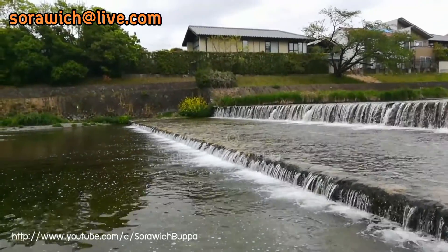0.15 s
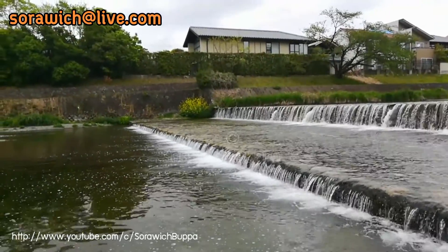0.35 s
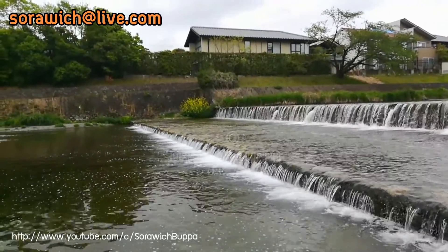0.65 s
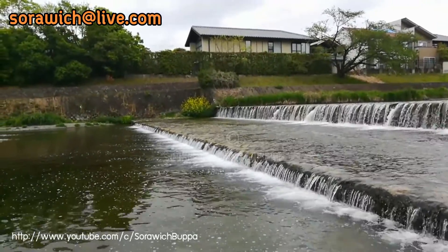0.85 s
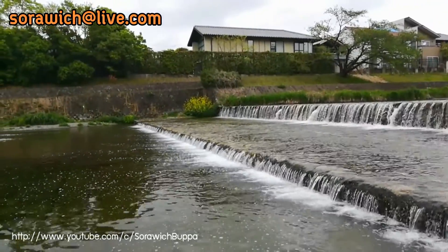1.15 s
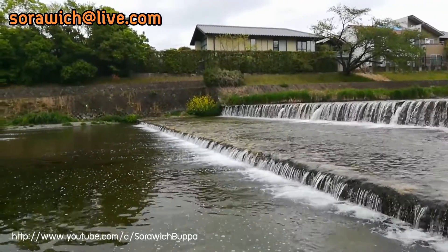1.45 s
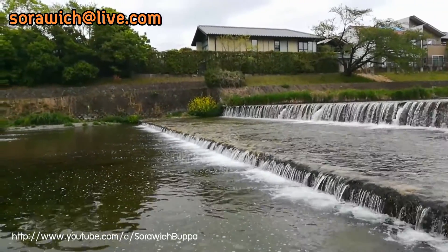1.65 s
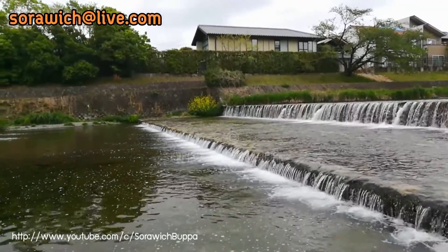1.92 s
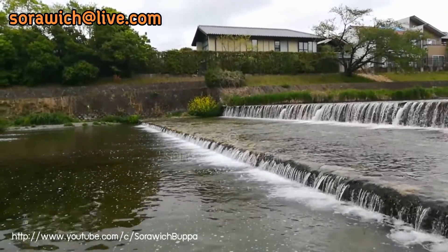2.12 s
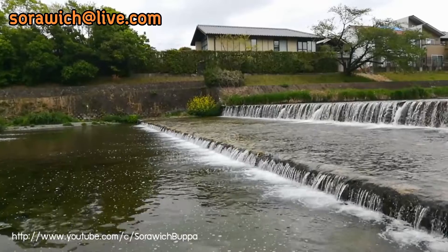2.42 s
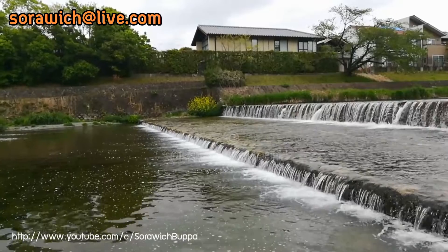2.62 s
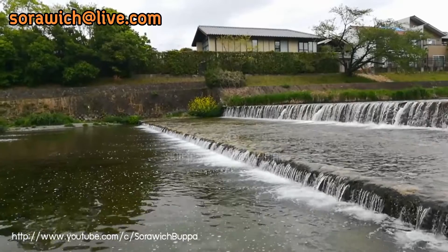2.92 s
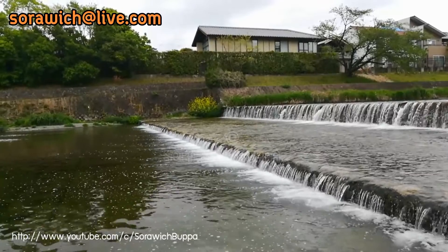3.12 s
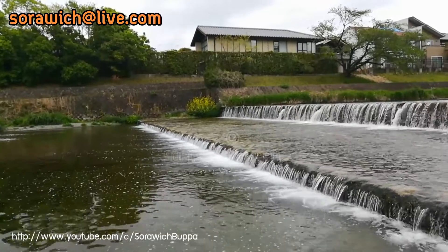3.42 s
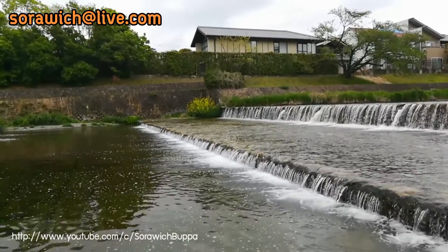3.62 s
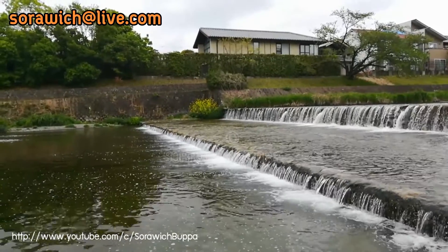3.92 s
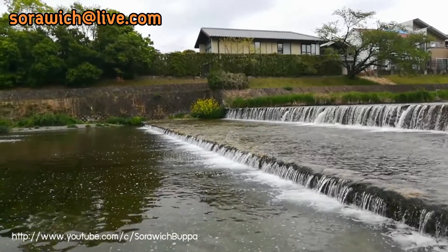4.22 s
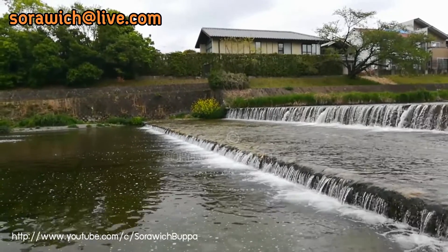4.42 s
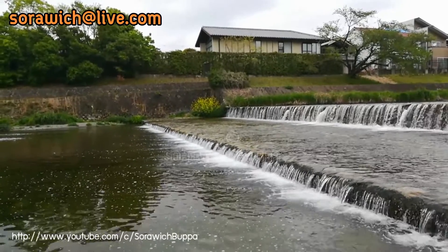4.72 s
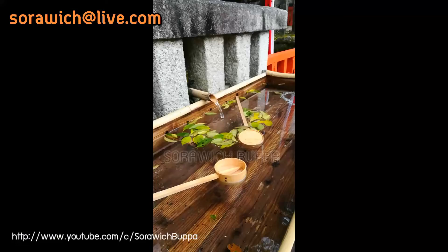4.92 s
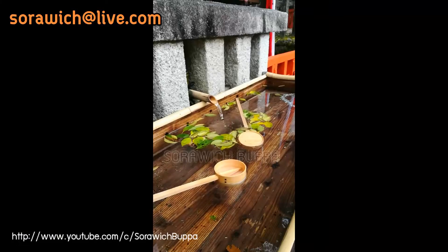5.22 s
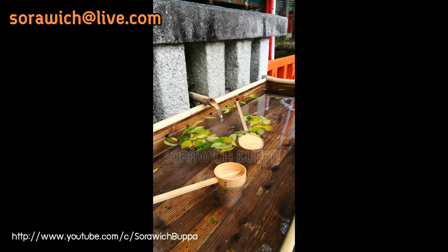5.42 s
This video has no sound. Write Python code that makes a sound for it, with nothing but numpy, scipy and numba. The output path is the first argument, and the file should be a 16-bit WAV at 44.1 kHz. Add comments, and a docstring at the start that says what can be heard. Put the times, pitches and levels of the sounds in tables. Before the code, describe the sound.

River water rushes loudly over low weirs with gusts rumbling on the microphone, stops dead, then a thin trickle fades in, gurgling into a basin.

```python
"""River weir, then bamboo spout

A river pours over low stepped weirs to the right: noise and swarms of ringing bubbles make the rush and spray.
A breeze rumbles on the microphone in gusts; late on, a surface close to the right port combs the hiss.
The rush stops dead; after a moment of silence a thin stream from a bamboo spout fades in, pattering
and gurgling into a basin: high bubble swarms, a few fine rings, low damped bubbles and a spatter of drops."""
import sys
import numpy as np
from scipy import signal
from scipy.fft import rfft, irfft
from scipy.io import wavfile
from numba import njit

SR = 44100
rng = np.random.default_rng(int(sys.argv[2]) if len(sys.argv) > 2 else 0)


def unload_wav(signal):
    """Save mono or channel-first audio to the path in sys.argv[1] as 16-bit WAV at rate SR, clipped to [-1, 1]."""
    wavfile.write(
        sys.argv[1],
        SR,
        np.round(np.clip(np.atleast_2d(signal).T, -1, 1) * 32767).astype(np.int16),
    )


N = 244735
T = np.arange(N) / SR
HZ = np.maximum(np.arange(N // 2 + 1) * SR / N, 1)


def undb(db):
    """Decibels to gain."""
    return 10 ** (np.asarray(db) / 20)


def unit(x):
    """Centre and scale to rms 1."""
    return (x - np.mean(x)) / np.std(x)


def curve(rows):
    """Join (t/s, value) rows by straight lines."""
    return np.interp(T, *np.transpose(rows))


def over_hz(rows):
    """Each column of an (f/Hz, ..) table on a log-frequency axis."""
    hz, *columns = np.transpose(rows)
    return np.array([np.interp(np.log(HZ), np.log(hz), column) for column in columns])


def colour(x, rows):
    """Filter by an (f/Hz, level/dB) or (f/Hz, left level/dB, right level/dB) table."""
    return irfft(rfft(x) * undb(over_hz(rows)), N)


def walk(rate_hz):
    """Smooth chance of spread 1 that changes about rate_hz times a second."""
    lowpass = np.exp(-(HZ / rate_hz) ** 2)
    return unit(irfft(rfft(rng.standard_normal(N)) * lowpass, N))


@njit
def ring(start_s, hz, t60_s, size, rise):
    """Damped sines whose pitch climbs by the share rise while they die: bubbles nearing the surface."""
    out = np.zeros(N)
    for k in range(len(start_s)):
        first, length = int(start_s[k] * SR), t60_s[k] * SR
        step = 2 * np.pi * hz[k] / SR
        z = size[k] + 0j
        turn = np.exp(1j * step - np.log(1000) / length)  # one sample of rotation and decay
        glide = np.exp(1j * step * rise / length)
        for i in range(max(first, 0), min(first + int(length), N)):
            out[i] += z.imag
            z *= turn
            turn *= glide
    return out


def swarm(low_hz, high_hz, cycles, spread_db, rise, count):
    """Bubbles of random moment, pitch and size, together as dense as a unit white noise in their band."""
    when, pitch, life, chance = rng.random((count, 4)).T
    hz = low_hz + (high_hz - low_hz) * pitch
    t60_s = cycles * (.5 + life) / hz
    # with a positive spread most are small and a few stand out
    size = undb(-spread_db * np.log(chance + 0.003)) / np.sqrt(t60_s)
    bubbles = unit(ring(when * N / SR, hz, t60_s, size, rise))
    return bubbles * np.sqrt((high_hz - low_hz) / (SR / 2))


def froth(grains, share):
    """Single grains, by their share of the power, over the smooth wash of countless distant ones."""
    share = np.clip(share, 0, 1)
    return np.sqrt(share) * grains + np.sqrt(1 - share) * rng.standard_normal(N)


def ports(pair):
    """Make two unrelated sounds alike at the two microphone ports by a share that varies with pitch."""
    # how alike the ports hear the water: (f/Hz, likeness 0-1, phase lead of the right port/rad)
    port_likeness = [(160, 0.98, -0.2), (290, 0.9, 0.84), (453, 0.9, 1.49), (610, 0.84, 2), (795, 0.7, 1.5),
                     (970, 0.5, 1.25), (1230, 0.5, 0.37), (1470, .15, 1.65), (1570, 0.5, 0.24),
                     (1710, 0.63, 2.5), (2200, 0.07, -0.5), (2370, 0.5, -1.5), (3120, 0.6, -5.5),
                     (4020, 0.8, -7.5)]
    likeness, lead = over_hz(port_likeness)
    likeness = np.clip(likeness, 0, 1)
    left, other = rfft(np.array(pair))
    right = likeness * left + np.sqrt(1 - likeness ** 2) * other
    return irfft(np.array([left, right * np.exp(1j * lead)]), N)


def plunge():
    """The falling sheet drives air under: bubbles over the roar of bubble clouds, singly on the near right side."""
    # the rush, as the level of a white noise of the same density: (f/Hz, left level/dB, right level/dB)
    rush_levels = [(20, -35.5, -33), (84, -18.5, -19.5), (162, -13, -13), (279, -19.5, -21),
                   (440, -19, -17), (643, -24, -19.5), (830, -18.5, -13.5), (1030, -20.5, -18.5),
                   (1262, -14.5, -16.5), (1374, -21.5, -21), (1510, -18, -19), (2070, -23, -27.5),
                   (3180, -25, -28), (12000, -44.5, -43.5)]
    far = swarm(62, 5987, cycles=20, spread_db=2.0, rise=0.079, count=24000)
    far = froth(far, share=0.38) * undb(0.16 * walk(22))
    near = swarm(59.3, 6074, cycles=30, spread_db=3.0, rise=0.086, count=22000)
    near = froth(near, share=0.7) * undb(.35 * walk(22))
    return colour(ports([far, near]), rush_levels)


def fizzing():
    """One port's fizz: short high rings in a wash whose level flickers."""
    grains = swarm(1509, 15710, cycles=53, spread_db=2.0, rise=0.037, count=60000)
    return froth(grains, share=0.51) * undb(0.26 * walk(25))


def spray():
    """Droplets and bursting foam fizz along the foot of the weir, swelling a little with the flow."""
    # brighter on the side that faces the fall: (f/Hz, left level/dB, right level/dB)
    spray_levels = [(500, -54, -57), (2630, -26, -29), (4800, -21, -20.5), (5900, -22, -22.5),
                    (7100, -23, -18), (8900, -26.5, -16), (9800, -31, -16.5), (11080, -27, -15.5),
                    (12700, -33.5, -20.5), (15500, -29, -30.5)]
    fizz = np.array([fizzing() for _ in range(2)])
    return colour(fizz, spray_levels) * undb(0.12 * walk(1.5))


def breeze():
    """Gusts swell and ebb over a light air and rumble on the microphone, nearly alike at both ports."""
    # spectrum shape of the wind rumble: (f/Hz, level/dB)
    rumble_shape = [(3, -42.5), (12, -15.5), (28, -2.5), (52, -3.5), (100, -7), (175, -9.5), (300, -27.5),
                    (900, -70.5)]
    # gusts: (strongest at t/s, rumble level/dB, length/s)
    gust_rows = [(.22, -51, .5), (1.283, -37, 0.29), (1.85, -37.5, .28), (2.14, -31, 0.29), (2.6, -39, .4),
                 (2.95, -37, 0.19), (3.61, -37, 0.12), (4.03, -39.5, 0.44), (4.33, -35.5, 0.13),
                 (4.58, -37.5, 0.16), (4.78, -42, 0.13)]
    lull_db, eddy_db = -52, -17  # air between gusts; eddies that differ between ports, relative to the rumble
    power = undb(lull_db) ** 2
    for at, db, length in gust_rows:
        swell = undb(db) * np.exp(-(2 * (T - at) / length) ** 2)
        power = power + swell ** 2
    shared, eddies = (unit(colour(rng.standard_normal(N), rumble_shape)) for _ in range(2))
    return (shared + undb(eddy_db) * np.vstack([eddies, -eddies])) * np.sqrt(power)


def reflect(water, lag_s=0.000286):
    """A surface close to the right port, perhaps a finger: its very short inverted echo combs the hiss."""
    # how much the surface reflects: (t/s, share 0-1)
    nearness = [(3.5, 0), (4.2, 0.8), (4.84, 1.0)]
    # what it reflects: (f/Hz, level/dB)
    reflection = [(700, -38.5), (2000, -9), (3500, -28), (5500, -10.5), (7200, -9), (8400, -10),
                  (9500, -20), (13000, -33)]
    mirrored = colour(water[1], reflection)[0]
    echo = irfft(rfft(mirrored) * np.exp(-2j * np.pi * HZ * lag_s), N)
    return np.array([water[0], water[1] - curve(nearness) * echo])


def pattering():
    """One port's patter: bubbles in a wash whose level flickers."""
    grains = swarm(304, 16370, cycles=72, spread_db=2.0, rise=.03, count=26000)
    return froth(grains, share=0.55) * undb(0.51 * walk(25))


def trickle():
    """The thin stream patters on the water; tiny bubbles keep ringing at a few high pitches."""
    # the stream hitting the basin, before the basin gain: (f/Hz, left level/dB, right level/dB)
    trickle_levels = [(300, -44, -42.5), (550, -46, -46), (780, -42, -38), (900, -44, -44),
                      (1020, -39, -34.5), (1240, -44, -42.5), (1500, -43, -43), (2480, -46.5, -44.5),
                      (5000, -41, -40.5), (6400, -43, -37), (7700, -49, -39.5), (8400, -49, -39),
                      (15000, -59.3, -46)]
    # fine rings, before the side and basin gains: (f/Hz, width/Hz, level/dB)
    ring_rows = [(5950, 44, -63), (6340, 60, -62), (6630, 93, -60), (7000, 50, -61), (7670, 55, -60)]
    patter = np.array([pattering() for _ in range(2)])
    rings = 0
    for hz, width, db in ring_rows:
        resonance = 1 / (1 + 2j * (HZ - hz) / width)
        rings = rings + undb(db) * unit(irfft(rfft(patter) * resonance, N))
    return colour(patter, trickle_levels) + rings * undb([[-2], [3]])  # left, right


def open_air():
    """A low murmur of the open air round the basin, as shaped noise alike at both ports."""
    # before the basin gain: (f/Hz, level/dB)
    air_levels = [(15, -27.5), (60, -28), (130, -31.5), (200, -38.5), (320, -40.5), (480, -56), (1500, -60)]
    return colour(rng.standard_normal(N), air_levels)


def gurgles():
    """Larger bubbles pinch off under the stream and ring, many of them low."""
    # bubbles, before the basin gain: (t/s, starting f/Hz, peak level/dB, t60/s)
    bubble_rows = [(5.135, 300, -49, 0.2), (5.235, 368, -52.5, 0.19), (5.245, 1016, -52, .08),
                   (5.278, 264, -47, 0.18), (5.345, 1174, -54, 0.35), (5.362, 269, -43.5, 0.34),
                   (5.415, 1025, -44, 0.068), (5.452, 196, -46, .09), (5.512, 1025, -54, 0.053),
                   (5.535, 960, -51, .06)]
    start_s, hz, db, t60_s = np.array(bubble_rows, float).T.copy()
    return ring(start_s, hz, t60_s, undb(db), .02)


def spatter():
    """A few drops land together with a short bright splash that starts at once and dies away."""
    # the splash, before the side and basin gains: (t/s, level/dB, decay length/s)
    splash = (5.503, -37, 0.016)
    start, db, length = splash
    drops = np.array([swarm(4300, 8200, cycles=50, spread_db=-1.0, rise=.03, count=12000) for _ in range(2)])
    drops = unit(colour(drops, [(4500, -2), (6200, 0), (6900, -7), (7800, -1)]))  # (f/Hz, level/dB)
    decay = (T > start) * np.exp(-np.abs(T - start) / length)
    return drops * decay * undb(db + np.array([[-4], [2]]))  # left, right


def scene():
    """First the weir, cut off with a tail of a few milliseconds, then the basin fades in evenly."""
    weir_end_s, cut_tail_s = 4.8425, 0.0056
    basin_start_s, fade_from_s, fade_length_s, basin_db = 4.973, 4.968, 0.32, 0.95
    weir = reflect(plunge() + spray()) + breeze()
    tail = undb(-20) * np.exp(-np.abs(T - weir_end_s) / cut_tail_s)
    ending = np.where(T < weir_end_s, 1, tail)
    basin = trickle() + open_air() + gurgles() + spatter()
    fade = np.clip((T - fade_from_s) / fade_length_s, 0, 1) * (T > basin_start_s)
    return weir * ending + basin * undb(basin_db) * fade


def record(dry):
    """The recorder cuts the top steeply above 15850 Hz."""
    return signal.sosfilt(signal.ellip(12, .1, 80, 15850, fs=SR, output="sos"), dry)


dry = scene()
out = record(dry)
unload_wav(out)
```